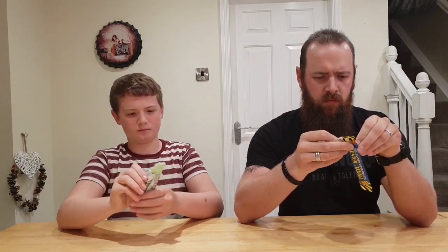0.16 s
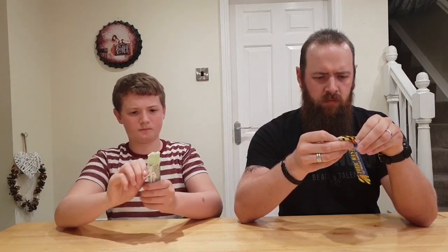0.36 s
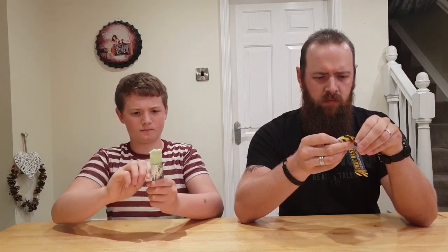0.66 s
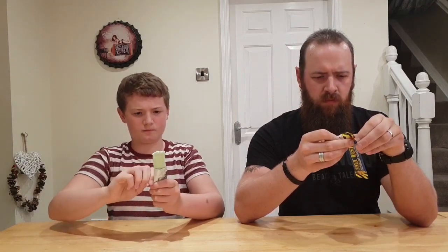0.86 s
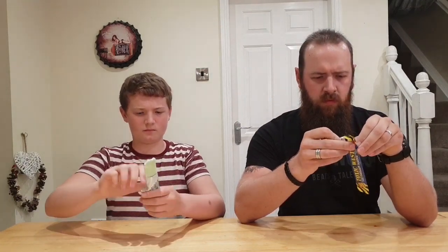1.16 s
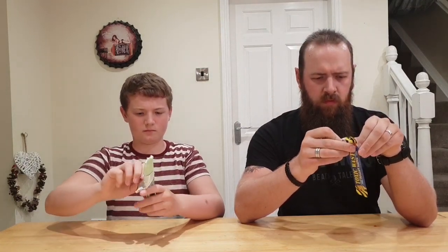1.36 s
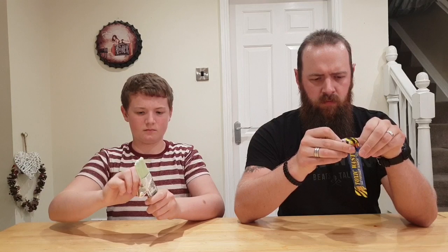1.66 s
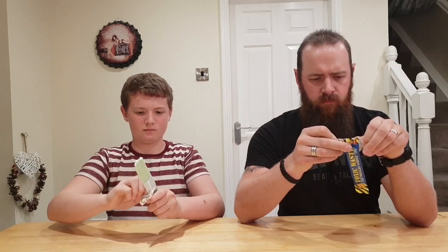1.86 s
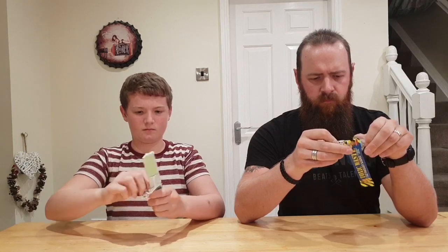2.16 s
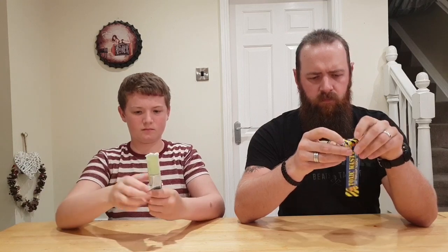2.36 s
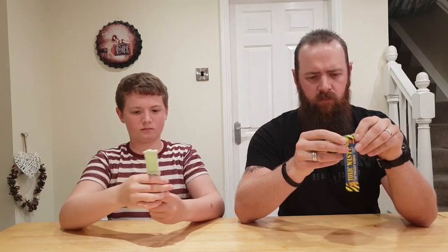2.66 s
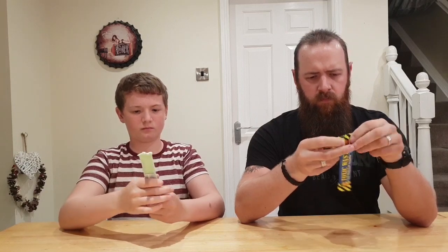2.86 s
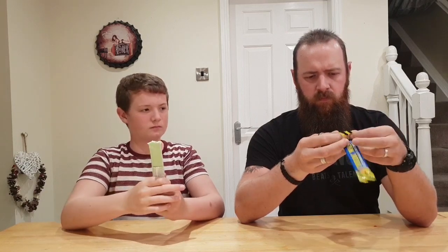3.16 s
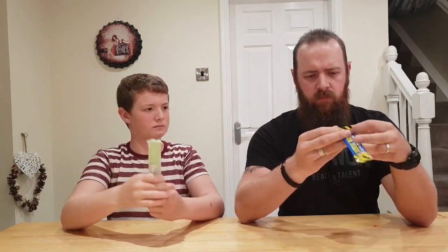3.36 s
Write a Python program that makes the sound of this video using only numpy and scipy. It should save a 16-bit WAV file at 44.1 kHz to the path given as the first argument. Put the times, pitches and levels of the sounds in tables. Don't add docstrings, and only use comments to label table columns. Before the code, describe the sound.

Plastic wrapper crinkling with sharp snaps, close on a phone at a hard kitchen table; first thin crackles on the left, then a fuller, busier wrapper on the right, over very faint low hum.

```python
import sys
import numpy as np
from scipy import signal
from scipy.fft import rfft, irfft
from scipy.io import wavfile
from scipy.ndimage import uniform_filter1d, minimum_filter1d

SR = 44100
rng = np.random.default_rng(int(sys.argv[2]) if len(sys.argv) > 2 else 0)


def file_out(sig):
    cols = np.atleast_2d(sig).T
    lim = np.clip(cols, -1, 1)
    pcm = np.round(lim * 32767).astype(np.int16)
    wavfile.write(sys.argv[1], SR, pcm)


def makeup_ratio(level_db):
    decades = np.asarray(level_db, float) / 20
    return 10 ** decades


N = 154350
SNAP_FALL_S = 0.0012
LEAD_SAMPLES = 8


def evened(x):
    return x / np.sqrt(np.mean(x ** 2) + 1e-20)


def read(points, hz):
    f, value = np.transpose(points)
    return np.interp(np.log(hz + 1), np.log(f + 1), value)


def add(mix, s, sound):
    part = mix[round(s * SR):][:len(sound)]
    part += sound[:len(part)]


def causal(db):
    log = np.log(makeup_ratio(np.maximum(np.r_[db, db[-2:0:-1]], -100)))
    return np.exp(log - 1j * signal.hilbert(log).imag)[:len(db)]


def slow(rate_hz):
    low_pass = signal.butter(1, rate_hz, fs=SR, output="sos")
    wander = signal.sosfiltfilt(low_pass, rng.standard_normal(3 * N))
    return evened(wander[N:2 * N])


def fold(noise, lumps, body_db, edge_db, ring_hz, fall_s):
    # pitch in Hz, level in dB.
    film = [(400, -49), (800, -14), (1300, -16), (1750, -10.5), (3800, -0.5), (6500, -2.5), (7800, -6),
            (10500, -4.5), (14000, -6.5)]
    rise_s, ring_db, ring_width = 0.00035, 8.5, 0.073
    lump_db, place_samples = 3, 1.4
    t = np.arange(512) / SR
    hz = np.fft.rfftfreq(512, 1 / SR)

    tilt = [(700, 1.14 * body_db - 4.0), (1600, body_db), (2200, body_db),
            (4500, 0), (7000, 0), (10000, edge_db)]
    ring = ring_db * np.exp(-(np.log((hz + 1) / ring_hz) / ring_width) ** 2 / 2)
    db = read(film, hz) + read(tilt, hz) + ring

    burst = rfft(noise * (1 - np.exp(-t / rise_s)) * np.exp(-t / fall_s))
    flat_burst = burst / np.sqrt(uniform_filter1d(abs(burst) ** 2, size=7) + 1e-9)
    lumpy_db = db + lump_db * np.interp(hz, np.linspace(0, SR / 2, len(lumps)), lumps)
    delay = LEAD_SAMPLES + np.outer([0, 1], place_samples * lumps[-1])
    near = irfft(flat_burst * causal(lumpy_db) * np.exp(-2j * np.pi * hz / SR * delay))
    near /= abs(signal.hilbert(near[0])).max()
    to_walls = evened(irfft(causal(db))) * np.std(near)
    return np.array([*near, to_walls])


def snapping(snaps):
    out = np.zeros((3, N))
    draw = rng.standard_normal((60, 532))
    for (s, db, body_db, edge_db, ring_hz), d in zip(snaps, draw):
        snap = fold(d[:512], d[512:], body_db, edge_db, ring_hz, SNAP_FALL_S)
        add(out.T, s - LEAD_SAMPLES / SR, makeup_ratio(db + 1.5) * snap.T)
    return out


def crackling(snaps, effort, film_body_db):
    folds_per_s, spread_db, level_db, clump_db = 900, 3.5, 5, 3
    follow, colour_db = 0.59, 4
    t = np.arange(N) / SR

    size = makeup_ratio(spread_db * np.minimum(rng.exponential(1, N), 2.5) + clump_db * slow(17))
    effort_s, effort_db = np.transpose(effort)
    size *= makeup_ratio(np.interp(t, effort_s, effort_db, -120, -120) + level_db)
    size *= rng.random(N) < folds_per_s / SR

    snap_s, snap_body_db = np.transpose(snaps)[[0, 2]]
    body_db = follow * np.interp(t, snap_s, snap_body_db) + colour_db * rng.uniform(-1, 1, N)
    kind = np.clip(np.round(body_db / 2) + 8, 0, 15)
    draw = rng.standard_normal((16, 532))
    rings = rng.permutation(np.geomspace(2500, 12000, 16))
    out = np.zeros((3, N))
    for k, (d, ring_hz) in enumerate(zip(draw, rings)):
        kind_body_db = film_body_db + 2 * (k - 8)
        edge_db = 2.1 + 2.26 * d[512]
        grain = fold(d[:512], d[512:], kind_body_db, edge_db, ring_hz, 0.5 * SNAP_FALL_S)
        out += signal.oaconvolve((size * (kind == k))[None], grain, axes=1)[:, :N]
    return out


def wrapper(snaps, effort, film_body_db):
    return snapping(snaps) + crackling(snaps, effort, film_body_db)


def tail():
    # pitch in Hz, time to fall by 60 dB in seconds.
    room = [(500, .36), (3000, .38), (9000, .34), (14000, .32)]
    taps = np.zeros((2, SR // 2))
    at = np.arange(160, SR // 2 - 20, 20) + rng.integers(0, 20, (2, (SR // 2 - 161) // 20))
    np.put_along_axis(taps, at, rng.choice([-1., 1.], at.shape), 1)
    hz, t, z = signal.stft(taps, SR, nperseg=256)
    fading = z * makeup_ratio(-60 * t / read(room, hz)[:, None])
    out = signal.istft(fading, SR, nperseg=256)[1]
    return out * makeup_ratio(-3.5) / np.linalg.norm(out[0])


def seat(x, pan_db, lag):
    # delay in seconds, level in dB.
    early = [(.0013, -8), (.0052, -14)]
    first = np.zeros((2, 1200))
    for c, late in enumerate((max(lag, 0), max(-lag, 0))):
        first[c, late] += 1
        for (s, db), skew in zip(early, rng.integers(0, 9, len(early))):
            first[c, late + round(s * SR) + skew] += makeup_ratio(db)
    out = signal.oaconvolve(x[:2], first, axes=1)[:, :N]
    t = np.arange(N) / SR
    for k in range(3):
        share = np.sqrt(2 / 3) * np.cos(2 * np.pi * (7 * t + k / 6))
        out += signal.fftconvolve(x[2:] * share, tail(), axes=1)[:, :N]
    return out * makeup_ratio([[pan_db / 2], [-pan_db / 2]])


def left_hands():
    # start in seconds, strength in dB, low body in dB, bright edge in dB, ring in Hz.
    snaps = [(0.0144, -36, -12.5, 2, 10500), (0.0393, -30, 2, 13, 11600), (0.1216, -32, -1, -3, 9050),
             (0.1403, -27.5, -9, 2, 9800), (0.1493, -30.5, 5.5, -2, 2700), (0.1991, -32, 3.5, 2, 10600),
             (0.3946, -29, 4.5, 2, 2730), (0.4209, -16, 2.5, 2, 7100), (0.4526, -23.5, -7, -1, 6860),
             (0.4901, -32, 1, 3, 10000), (0.5521, -29, 5, -24, 3540), (0.579, -31, -4.5, 2, 9100),
             (0.5903, -22, 14.5, -1, 2060), (0.6336, -11, -6, -0.5, 7000), (0.638, -21, 12, 12, 10800),
             (0.6599, -21, 2, -1, 12900), (0.6729, -28, -2, -5, 6800), (0.71, -20.5, 8, 8.5, 3180),
             (0.8158, -33.5, -5.5, -29, 2730), (0.8665, -22.5, -11, 1, 6950), (0.8905, -29, -17, -7, 6880),
             (0.9329, -15, -10, 7, 7040), (0.9424, -13.5, -10.5, 2, 11200), (0.9451, -9.5, 5.5, 4, 10150),
             (0.9614, -20, -5, -16, 6900), (1.1495, -20, -22.5, -3.5, 9600),
             (1.209, -30.5, -14.5, -6, 4700), (1.2306, -22.5, -12.5, 0, 3460),
             (1.2527, -22.5, -1.5, 10, 12600), (1.2875, -26, -0.5, 3, 11600), (1.2981, -21, 2, 5, 5980),
             (1.3361, -20.5, 2, -1, 5200), (1.3637, -18, -3, -6, 3330), (1.4014, -33, -22, -3, 7100),
             (1.4622, -25, -15.5, -1.5, 5340), (1.5443, -30, 12.5, -9, 2900), (1.5513, -24.5, 14, -1, 3540),
             (1.6212, -36, -2.5, 21, 10000)]
    # time in seconds, effort in dB.
    effort = [(0.0, -44.5), (.04, -45.5), (0.098, -62.5), (0.148, -39), (.25, -74), (.4, -60.5),
              (0.549, -45.5), (.62, -37.5), (0.658, -35.5), (.8, -82.5), (.92, -44), (0.971, -37),
              (1.1, -107), (1.249, -34), (1.381, -46.5), (1.5, -49.5), (1.57, -46), (1.738, -54.5)]
    return seat(wrapper(snaps, effort, film_body_db=1.5), pan_db=5.0, lag=-5)


def engine():
    # time in seconds, pitch in Hz, level in dB.
    course = [
        (0, 65.2, -78),
        (.3, 68.6, -64.5),
        (.76, 67.3, -57.5),
        (1.049, 70.1, -62),
        (1.75, 75.15, -72.5),
        (3.5, 74.75, -69),
    ]
    s, hz, db = np.transpose(course)
    t = np.arange(N) / SR
    turn = 2 * np.pi * np.cumsum(np.interp(t, s, hz)) / SR
    level = np.sqrt(2) * makeup_ratio(np.interp(t, s, db) + 0.7 * slow(2.2))
    octave = makeup_ratio(-29.5 + 3.0 * slow(1)) * np.sin(2 * turn)
    return level * (np.sin(turn) + octave)


def rumble():
    # pitch in Hz, level in dB.
    tone = [(20, -0.5), (45, -14), (75, 1.5), (140, 2.5), (200, -14), (300, -14), (1000, -25.5),
            (4000, -21.5), (15000, -23)]
    hz = np.fft.rfftfreq(N, 1 / SR)
    a, b = rfft(rng.standard_normal((2, N)))
    same = np.clip(read([(60, 0.45), (300, 0.35), (1500, 0.1)], hz), 0, 1)
    z = np.array([a, same * a + np.sqrt(1 - same ** 2) * b])
    return makeup_ratio(-67.5 + 1.73 * slow(6.0)) * evened(irfft(z * makeup_ratio(read(tone, hz)), N))


def right_hands():
    # start in seconds, strength in dB, low body in dB, bright edge in dB, ring in Hz.
    snaps = [(1.7443, -30, 0.5, 6, 7060), (1.7473, -27.5, -2, -2, 7100), (1.7634, -25, 6, -8, 3140),
             (1.8026, -25, -3, -10, 3800), (1.8238, -23.5, 3.5, 4, 6900), (1.8402, -25.5, -1, -7, 11780),
             (1.8925, -26, -10, -5, 6500), (1.9058, -19.5, -3.5, 3, 11200), (1.9223, -10.5, 2.5, 9, 11600),
             (1.9274, -14, -0.5, -5, 3360), (1.9328, -8, -6.5, -4, 5240), (1.9396, -19.5, -5, -17, 3660),
             (1.9458, -18, -6, -19, 5386), (1.9976, -9, -6, 5.5, 3580), (2.021, -30, -3, 7, 5200),
             (2.038, -18.5, -4.5, 9, 11300), (2.0816, -25, -12.5, 10, 8900), (2.1053, -12.5, -7, -38, 3360),
             (2.1114, -23.5, -4, -25, 4060), (2.1435, -17, 11, 3.5, 1750), (2.1551, -18.5, 8, -12, 3500),
             (2.1943, -13.5, 9, 0, 1470), (2.2236, -23.5, -7, -7, 3670), (2.2302, -25, 2, -14, 3000),
             (2.2891, -30, 14, 2, 1730), (2.3458, -33.5, 16.5, 13, 1700), (2.3685, -25, 8.5, -20, 1720),
             (2.4219, -35, -3, -12, 5600), (2.4299, -20.5, 4, -4.5, 6400), (2.4364, -19.5, 7, 1.5, 11100)]
    last_snaps = [(2.547, -22.5, 4.5, -3.5, 2900), (2.6463, -35, 4, -5, 2970), (2.7059, -25.5, -6, 4, 6740),
                  (2.7431, -33, 4.5, -21, 2900), (2.7545, -25, 4.5, 5, 11700),
                  (2.7663, -30, -0.5, -13, 6590), (2.816, -27, 11.5, -12, 2737),
                  (2.8384, -22, -7.5, 3, 7000), (2.8518, -22.5, -2.5, -9, 4400),
                  (2.8693, -19.5, -1, -6, 6000), (2.9169, -22, 7.5, -8, 3100), (2.973, -23, 7, 7, 3400),
                  (2.9967, -28.5, 2.5, -15, 7240), (3.021, -17.5, 8.5, 2, 1830),
                  (3.0682, -22, 11.5, 22, 10500), (3.0788, -18.5, 1, -0.5, 12900),
                  (3.1189, -45, 17, -2, 2007), (3.141, -13, 1.5, 0.5, 3700),
                  (3.1461, -10.5, -8.5, -1, 5500), (3.152, -11, -3.5, -6, 7160),
                  (3.1705, -10, 18.5, 11.5, 1760), (3.212, -19.5, 6.5, -1, 3640),
                  (3.3106, -21, -6.5, 6, 6900), (3.355, -21, -13.5, 7, 7100), (3.3613, -18, -12, 21, 12000),
                  (3.3906, -24.5, -9.5, 3, 8900)]
    # time in seconds, effort in dB.
    effort = [(1.72, -58), (1.817, -38.5), (1.878, -43), (1.95, -25), (2.019, -36), (2.09, -54),
              (2.22, -50.5), (2.3, -49), (2.42, -43.5), (2.52, -58.5), (2.65, -55), (2.781, -43.5),
              (2.95, -45), (3.125, -40.5), (3.165, -40.5), (3.26, -46.5), (3.36, -47), (3.5, -49)]
    return seat(wrapper(snaps + last_snaps, effort, film_body_db=7.5), pan_db=2.6, lag=6)


def bumps():
    # peak time in seconds, level in dB, lower pitch in Hz.
    scuffs = [
        (2.198, -60.5, 349.9),
        (2.403, -60, 38.24),
        (2.503, -58, 88.89),
        (2.68, -67.5, 176),
        (2.861, -54, 367.2),
    ]
    swell_s = 0.029
    out = np.zeros(N)
    t = np.arange(SR // 4) / SR
    swell = t / swell_s * np.exp(1 - t / swell_s)
    for s, db, hz in scuffs:
        noise = rng.standard_normal(SR // 4)
        band_pass = signal.butter(2, [hz / 1.22, hz * 3.0], "bandpass", fs=SR, output="sos")
        band = evened(signal.sosfilt(band_pass, noise))
        rough_db = 5.3 * evened(uniform_filter1d(noise, 500))
        add(out, s - swell_s, makeup_ratio(db + rough_db) * swell * band)
    return out


def scene():
    low = (engine() + rumble() + bumps()) * makeup_ratio([[1.6], [-1.6]])
    return left_hands() + right_hands() + low


def phone_top(x):
    hz = np.fft.rfftfreq(N, 1 / SR)
    shelf_db = -36.0 * np.clip((hz - 14300) / 500, 0, 1.6)
    return irfft(rfft(x) * makeup_ratio(shelf_db), N)


def drop_masked(x):
    mask_db, mask_top_hz, mask_bass_db, attack_db = -20.0, 1500, -6.0, 7.0
    hz, t, z = signal.stft(x, SR, nperseg=2048, noverlap=1024)
    low_hz = hz[:1024, None]
    power = (abs(z) ** 2).mean(0)
    band = np.repeat(power[:1024].reshape(256, 4, -1).mean(1), 4, 0)
    crackle = power[100:600].mean(0)
    over_db = 10 * np.log10(band / crackle + 1e-12) - mask_db - low_hz / 250

    energy = np.diff(x.mean(0), prepend=0) ** 2
    before = uniform_filter1d(energy, 1024, origin=511)
    jump = uniform_filter1d(energy, 128) / (before + 1e-12)
    highest_jump = -minimum_filter1d(-jump, 1024)
    sharp = highest_jump[np.minimum(t * SR, N - 1).astype(int)] > makeup_ratio(2 * attack_db)
    over_db = np.where(sharp, np.where(low_hz < 170, over_db + mask_bass_db, 9), over_db)

    z[:, :1024] *= np.where(low_hz < mask_top_hz, np.clip(over_db / 2, .003, 1), 1)
    return signal.istft(z, SR, nperseg=2048, noverlap=1024)[1][:, :N]


def band_limit(x):
    return signal.sosfilt(signal.butter(12, 15960, fs=SR, output="sos"), x)


def record(dry):
    mix = drop_masked(phone_top(dry))
    return band_limit(mix)


dry = scene()
out = record(dry)
file_out(out)
```